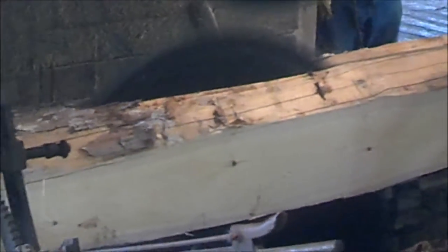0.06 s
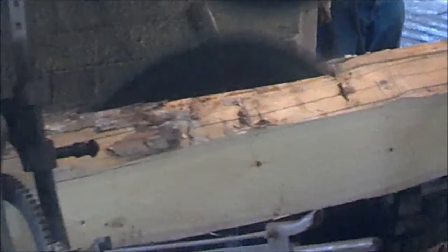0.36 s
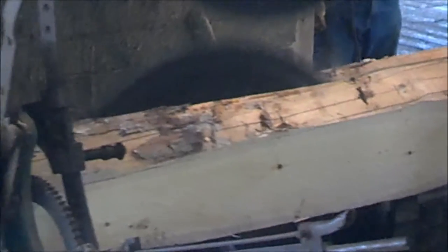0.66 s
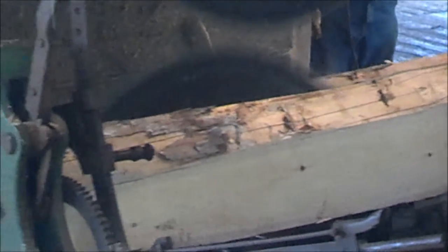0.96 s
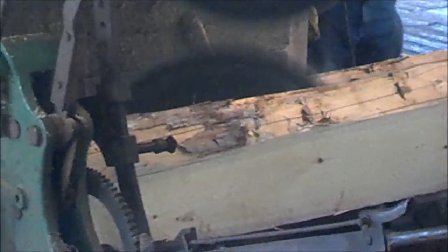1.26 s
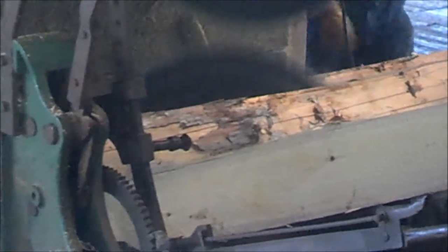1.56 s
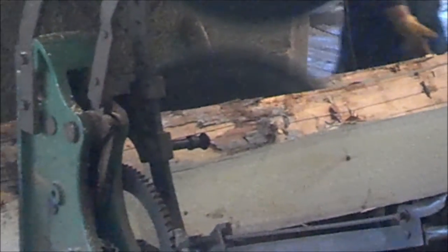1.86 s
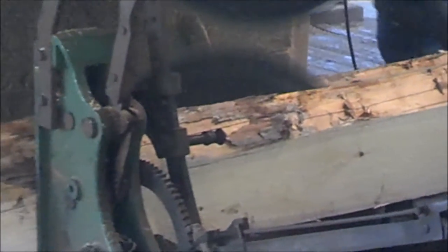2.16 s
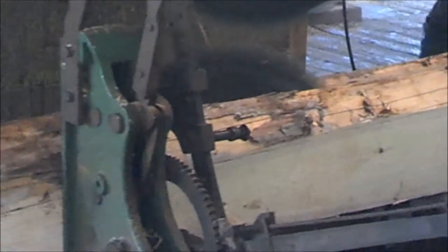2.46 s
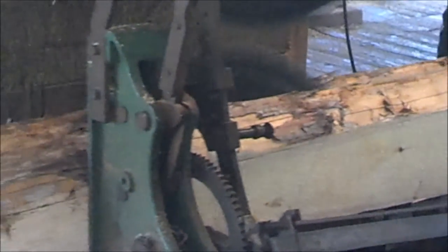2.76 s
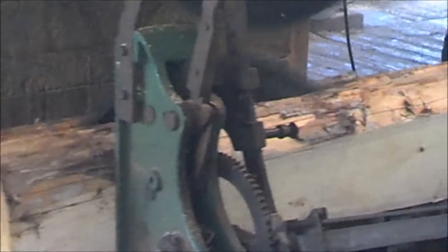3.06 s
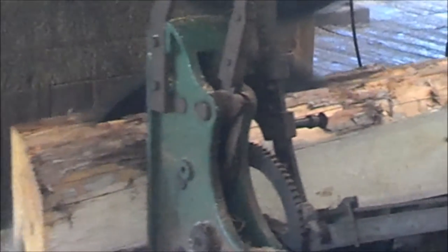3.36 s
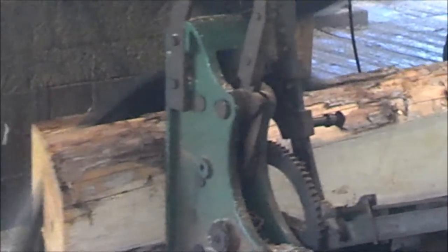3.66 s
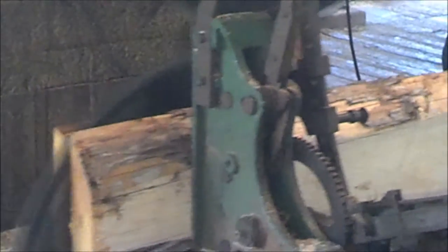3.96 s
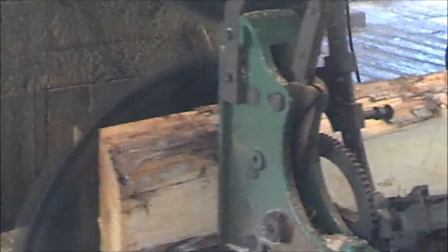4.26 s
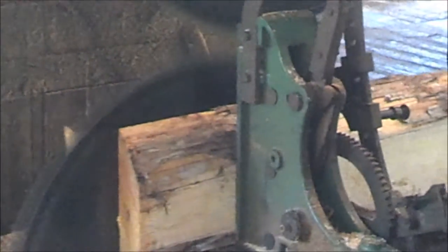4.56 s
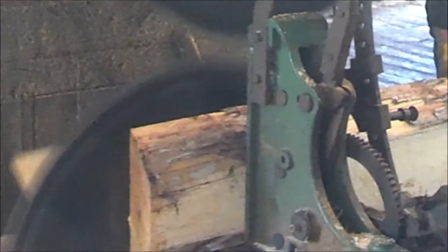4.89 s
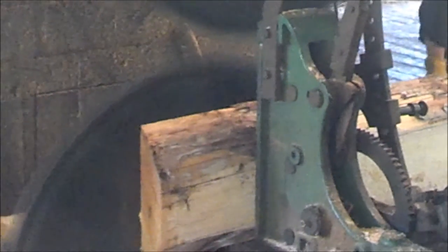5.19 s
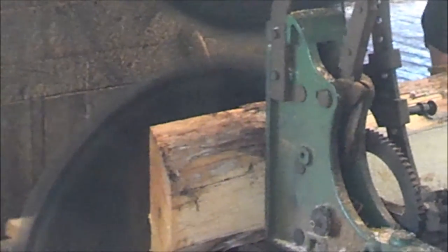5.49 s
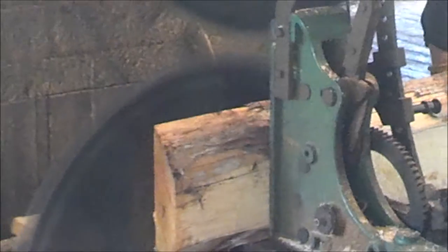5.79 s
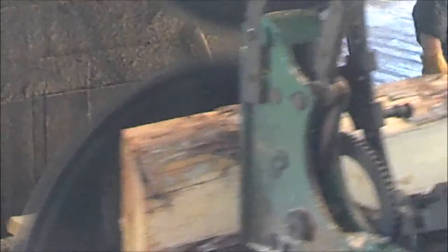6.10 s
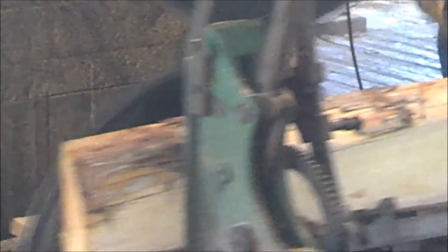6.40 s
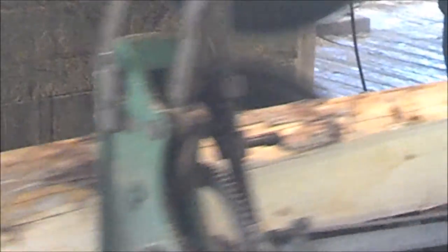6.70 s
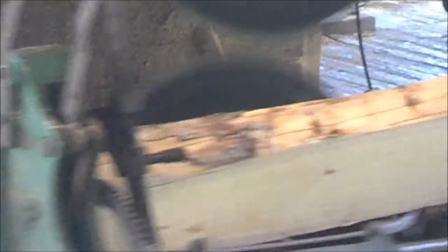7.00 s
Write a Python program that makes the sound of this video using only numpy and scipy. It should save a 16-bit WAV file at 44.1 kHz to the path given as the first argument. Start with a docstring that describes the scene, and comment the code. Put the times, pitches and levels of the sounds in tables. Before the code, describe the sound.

A circular sawmill blade roars and whines through a log, drops to machine rumble, then a slab clunks down and wood scrapes the blade.

```python
"""A sawmill's circular saw rips a log, whining at its tooth rate and labouring through a hard stretch.
The teeth leave the wood; the blade grazes the loose slab and speeds up while its steel plate sings.
The slab drops with a clunk and bounces; an automatic gain control ducks and slowly recovers.
The carriage rumbles back, and the log's sawn face brushes the blade about once a turn."""
import sys
import numpy as np
from scipy import signal
from scipy.fft import rfft, irfft, next_fast_len
from scipy.io import wavfile

SR = 44100
rng = np.random.default_rng(int(sys.argv[2]) if len(sys.argv) > 2 else 0)


def store_wav(level_fs):
    """Save 16-bit WAV to argv[1]."""
    pcm = np.round(np.clip(np.atleast_2d(level_fs), -1, 1) * 32767)
    wavfile.write(sys.argv[1], SR, pcm.T.astype(np.int16))


N = 314874
TIME = np.arange(N) / SR
TEETH, BITE_DB = 30, -33.5  # teeth on the blade; base level of the cut
ACCENT_S = 5.2  # a brief ring and a dip in the roar just after the clunk

# knots in the log: (time [s], half length [s], boost [dB])
KNOT_SURGES = [(0.26, 0.031, 2.5), (0.637, 0.16, 3), (2.02, 0.078, 1.5), (2.394, 0.096, 3),
               (3.133, 0.05, 3)]
# colour of tearing wood: (frequency [Hz], level [dB])
RIP_SPECTRUM = [(100, -20.5), (260, -7.5), (480, -12.5), (580, -6.5), (850, -2), (1250, -6.5), (1500, -6),
                (1750, -5), (2000, -4), (2400, -4), (2900, -3), (3120, -10.5), (3600, -7.5), (4300, -13.5),
                (7000, -24.5), (15000, -59.5)]
# colour of the cut's crackling hiss: (frequency [Hz], level [dB])
CRACKLE_SPECTRUM = [(1200, -35), (3000, -12), (4300, -4), (5700, -8.5), (6700, 2), (7600, -2.5),
                    (9000, 1.5), (10200, -9), (13000, 1), (15500, -5.5)]
def rip(teeth):
    """Teeth tear fibres: the log roars, and a crackling hiss throbs once a turn."""
    bite = amp(BITE_DB) * cutting() + amp(-47.5) * grazing() + 1e-9
    knots_db = sum(db * swell(s, half) for s, half, db in KNOT_SURGES)
    grain_db = 0.51 * wobble(16)  # harder and softer wood
    throb_db = 0.3 * np.cos(2 * np.pi * teeth / TEETH) + 0.85 * wobble(29.55)
    strokes = amp(.5 * np.cos(2 * np.pi * teeth))
    flutter = uneven_teeth(teeth, spread_db=1.4) * unit(amp(.8 * wobble(45)))
    snaps = amp(2.6 * wobble(6000))
    body = amp(10.5 + knots_db + grain_db + 0.8 * wobble(17)) * rush(RIP_SPECTRUM, strokes * flutter)
    depth = np.sqrt(np.minimum(bite / amp(BITE_DB), 1))  # a light touch crackles less
    crackle = amp(5 + grain_db + throb_db) * depth * rush(CRACKLE_SPECTRUM, strokes * snaps)
    return bite * (body + crackle)


# envelopes of tooth harmonics 1, 2 and 3: (time [s], level [dB])
HUM_ENVELOPE = [(0, -36.5), (1.5, -37), (1.75, -54), (2, -38.5), (2.65, -39), (2.82, -29.5), (3.23, -27),
                (3.3, -37), (3.43, -28.5), (3.58, -38), (3.82, -45), (3.92, -31.5), (4.22, -32),
                (4.4, -38.5), (4.75, -30), (5.6, -37.5), (6.2, -35.5), (6.48, -27.5), (6.83, -28.5),
                (7.14, -45)]
HOWL_ENVELOPE = [(0, -23.5), (.26, -21), (.32, -22.5), (.37, -31), (.52, -27.5), (.59, -21), (.9, -25),
                 (.97, -36), (1.3, -32), (2.15, -25.5), (2.28, -32), (2.48, -36), (2.52, -23), (3.46, -23),
                 (3.505, -34), (3.54, -27.5), (3.59, -17), (3.69, -39), (3.74, -22.5), (3.9, -27.5),
                 (3.99, -31.5), (4.1, -29), (4.27, -20.5), (4.33, -27), (4.9, -26), (5.3, -67), (6, -33),
                 (6.55, -26), (7.14, -29)]
THIRD_ENVELOPE = [(0, -32), (.28, -27.5), (.42, -29.5), (.55, -28), (.75, -34.5), (.97, -29), (1.12, -26.5),
                  (1.19, -37), (1.38, -30.5), (1.6, -29.5), (1.75, -41), (1.95, -28), (2.07, -25),
                  (2.16, -33), (2.32, -30.5), (2.42, -39), (3, -35), (3.14, -26), (3.32, -51), (3.43, -30),
                  (3.68, -32), (3.85, -28.5), (3.98, -32), (4.1, -57), (4.28, -26), (4.42, -44), (5.6, -49),
                  (7.14, -36)]
def whine(teeth):
    """Low harmonics of the tooth rate: firm under load, ragged when the blade runs free."""
    wood = cutting()
    firm = tone(2 * teeth, drift=.15, flutter_db=1.3, rate=30)
    ragged = tone(2 * teeth, drift=.5, flutter_db=2, rate=45)
    howl = amp(curve(HOWL_ENVELOPE)) * (wood * firm + (1 - wood) * ragged)
    hum_drift = .2 * wood + .45 * (1 - wood)
    hum = amp(curve(HUM_ENVELOPE)) * tone(teeth, hum_drift, flutter_db=2.2, rate=30)
    third = amp(curve(THIRD_ENVELOPE)) * tone(3 * teeth, drift=.55, flutter_db=2, rate=45)
    return hum + howl + third


# tooth harmonics 4 to 7: (early level [dB], later level [dB])
RASP_LEVELS = [(-38, -38.5), (-33.5, -35), (-34.5, -33.5), (-35.5, -38)]
def rasp(teeth):
    """Wood gives the whine its edge: upper harmonics that each swell and sink on their own."""
    out = 0
    for k, levels_db in enumerate(RASP_LEVELS, 4):
        db = np.interp(TIME, [1.008, 1.3], levels_db)  # the grain changes
        out += amp(db + 1.5 * wobble(4.15)) * tone(k * teeth, drift=.42, flutter_db=2.5, rate=35)
    return cutting() * out


# squeal accents: (time [s], half length [s], level [dB])
PINCHES = [(.72, .1, -34), (.98, 0.16, -33), (2.46, .07, -28.5), (2.77, .092, -31), (3.083, 0.089, -31),
           (3.8, 0.048, -26), (4.222, 0.024, -19)]
def squeal(teeth):
    """The fourth tooth harmonic squeals where the wood pinches the blade."""
    level = sum(amp(db) * swell(s, half) for s, half, db in PINCHES)
    return level * tone(4 * teeth, drift=0.33, flutter_db=3.5, rate=54)


# choked plate modes: (frequency [Hz], width [Hz], level [dB], gain while binding [dB])
DAMPED_MODES = [(917, 23, -41, 3.5), (1372, 52, -38, 4.5), (1627, 26, -44.5, 9.5), (2170, 130, -39.5, 2),
                (2310, 100, -33, 4), (2576, 120, -40, 4), (2914, 74, -33.5, -3)]
def damped_plate():
    """Wood around the blade damps its plate into broad, noisy resonances."""
    binding = swell(1.97, half=0.65)  # the cut closes on the blade
    return cutting() * sum(amp(db + bind_db * binding + 2.2 * wobble(4.98)) * resonance(hz, width)
                           for hz, width, db, bind_db in DAMPED_MODES)


# clear plate modes: (frequency [Hz], level in the cut [dB], when free [dB], as the slab lands [dB])
SINGING_MODES = [(1813, -44, -35, -38), (1907, -37.5, -32.5, -34)]
def singing_plate():
    """Two close modes of the steel plate sing out once it is free and fade after the slab lands."""
    wood, landing = cutting(), SLAB_HITS[0][0]
    fade_db = hold_db(0, landing, release=12)
    out = 0
    for hz, cut_db, free_db, landed_db in SINGING_MODES:
        ring_db = np.interp(TIME, [landing, landing + 0.054], [free_db, landed_db]) + fade_db
        level = wood * amp(cut_db) + (1 - wood) * amp(ring_db)
        out += level * tone(hz * TIME, drift=0.5, flutter_db=1.8, rate=16)
    return out


# rough spots on the sawn face: (time [s], length [s], level [dB])
ROUGH_SPOTS = [(6.475, .008, -29.5), (6.501, .01, -33), (6.55, .006, -31), (6.58, .004, -35),
               (6.628, .004, -38), (6.648, 0.019, -35), (6.722, 0.018, -34), (6.782, 0.031, -29),
               (6.86, .007, -28), (6.881, 0.018, -29.5), (6.958, .008, -35), (7.027, 0.014, -26),
               (7.094, 0.02, -31)]
# colour of the scrape: (frequency [Hz], level [dB])
SCRAPE_SPECTRUM = [(300, -8), (1500, -2.5), (2000, -2), (2500, 2), (3400, -5.5), (5600, -21), (6800, -17),
                   (10000, -22.5), (13000, -18), (15500, -17)]
def scrape(teeth):
    """The returning log brushes the blade; rough spots catch the teeth about once a turn."""
    catches = sum(amp(db + hold_db(s, s + length, attack=2000, release=600))
                  for s, length, db in ROUGH_SPOTS)
    grit = amp(2.4 * wobble(2000)) * uneven_teeth(teeth, spread_db=1.2)
    return (pressing() + catches) * rush(SCRAPE_SPECTRUM, grit)


def graze():
    """The loose slab touches the blade with one short rasp."""
    return amp(-29.5) * grazing() * resonance(hz=2373, width_hz=1000)


# tooth harmonics 5 to 7: (level relative to the steady scrape [dB])
RUB_LEVELS = [-9.5, -9, -9.5]
def rub(teeth):
    """Teeth rubbing the sawn face lay a pitched buzz under the scrape."""
    return pressing() * sum(amp(db) * tone(k * teeth, drift=.6, flutter_db=2.5, rate=30)
                            for k, db in enumerate(RUB_LEVELS, 5))


# landing and bounce: (time [s], ring level [dB], clatter level [dB])
SLAB_HITS = [(5.074, 6.5, -8), (5.0966, -1.5, -17), (5.334, -6.5, -9)]
# the slab's woody ring: (frequency [Hz], level [dB], t60 [s])
SLAB_MODES = [(326, -11.5, .13), (470, -10, .045), (560, -14, .07), (668, -6.5, .07), (735, -12, .09),
              (802, -14, .1), (886, -4.5, .1), (925, -2.5, .035), (1093, -14, .035), (1320, -7, .03)]
# colour of the rollers: (frequency [Hz], level [dB])
CLATTER_SPECTRUM = [(40, -31), (200, -3), (450, 0.5), (700, 3), (1000, -1), (1500, -17), (2500, -25),
                    (5000, -52), (15000, -64)]
def slab():
    """The heavy slab cracks onto the rollers and rings briefly; they clatter, and it bounces."""
    ring, clatter, crack = np.zeros((3, N))
    t = np.arange(SR // 2) / SR
    onset = 1 - np.exp(-t / 0.0016)
    modes = sum(amp(db - 60 * t / t60) * np.sin(2 * np.pi * hz * t) for hz, db, t60 in SLAB_MODES)
    for s, ring_db, clatter_db in SLAB_HITS:
        span = slice(round(s * SR), round(s * SR) + len(t))
        ring[span] += onset * amp(ring_db) * modes
        clatter[span] += (1 - np.exp(-t / 0.003)) * amp(clatter_db - 60 * t / 0.45)
        crack[span] += onset * amp(ring_db - 21 - 60 * t / .012)
    return ring + amp(-8) * shed(ring) + clatter * rush(CLATTER_SPECTRUM) + crack * rush(SCRAPE_SPECTRUM)


# colour of the machine bed: (frequency [Hz], level [dB])
ROAR_SPECTRUM = [(25, -38), (70, -20.5), (130, -9), (320, -6), (420, -6.5), (490, -7.5), (640, -0.5),
                 (850, 1), (1200, -6.5), (1430, -1), (1800, -10.5), (2150, -15), (3400, -27.5), (5600, -40),
                 (6800, -39), (10000, -44.5), (15000, -43.5)]
def roar():
    """Blade and drive roar and rattle, opening up as the cut ends and dipping just after the clunk."""
    open_db = np.interp(TIME, [3.7, 4.62], [-26, -20])
    lowered = np.interp(TIME, [SLAB_HITS[-1][0], 5.3], [0, 1])  # a step down near the slab's bounce
    dips_db = -2.5 * lowered - 2 * accent()
    level = amp(open_db + dips_db + 0.35 * wobble(14))
    rattle = amp(0.6 * wobble(250))
    return level * rush(ROAR_SPECTRUM, rattle)


# envelope of the rumble: (time [s], level [dB])
CARRIAGE_ENVELOPE = [(0, -36), (1, -41), (1.8, -32), (2.4, -39), (4, -33.5), (4.8, -30.5), (6, -34),
                     (6.6, -25.5), (7.14, -23.5)]
# colour of the rumble: (frequency [Hz], level [dB])
RUMBLE_SPECTRUM = [(25, -31), (70, -8), (150, 2.5), (280, 4), (420, -1), (700, -15), (2000, -50)]
# feed drones: (frequency [Hz], level relative to the rumble [dB], gain while labouring [dB])
FEED_DRONES = [(218.3, -11.5, 11), (286.7, -5.5, 0)]
def carriage():
    """The carriage rumbles on its rails and drones while it feeds the log."""
    level_db = curve(CARRIAGE_ENVELOPE)
    rumble = amp(level_db + 0.97 * wobble(10)) * rush(RUMBLE_SPECTRUM)
    labouring = amp(hold_db(2.74, 3.73, attack=53, release=53))  # a hard stretch of the log
    drone = sum(amp(db + labour_db * labouring) * tone(hz * TIME, drift=0.6, flutter_db=2, rate=16)
                for hz, db, labour_db in FEED_DRONES)
    feed_db = hold_db(0, 3.96, release=17)
    return rumble + amp(level_db + feed_db) * drone


# soft wheel thuds: (time [s], half length [s], level [dB])
WHEEL_THUDS = [(2.05, .1, -44), (4.53, .09, -36.5), (4.95, .1, -34)]
# colour of a thud: (frequency [Hz], level [dB])
THUD_SPECTRUM = [(45, -30), (85, -13), (120, 2), (150, -9), (260, -28), (1000, -80)]
def wheels():
    """The laden carriage thuds over its rails and groans for a moment in the cut."""
    thuds = sum(amp(db) * swell(s, half) for s, half, db in WHEEL_THUDS) * rush(THUD_SPECTRUM)
    groan = amp(-33) * swell(1.8, half=.2) * resonance(hz=295, width_hz=40)
    return thuds + groan


def frame():
    """The carriage's iron frame rings briefly just after the clunk, then rattles on."""
    rattling = np.clip((TIME - ACCENT_S) / 0.018, 0, 1)
    level = amp(-28) * accent() + amp(-37 + 4.2 * wobble(45)) * rattling
    return level * resonance(hz=1496, width_hz=140)


# reverb of the shed: (frequency [Hz], t60 [s])
SHED_DECAY = [(150, 0.97), (1000, 0.44), (10000, 0.099)]
def shed(x):
    """The walls answer with a stereo tail whose treble dies first."""
    hz, t, noise = signal.stft(rng.standard_normal((2, SR // 2)), SR, nperseg=256)
    decay = amp(-60 * t / along(SHED_DECAY, hz)[:, None])
    _, tail = signal.istft(noise * decay, SR, nperseg=256)
    return signal.fftconvolve(x[None], tail / np.linalg.norm(tail[0]), axes=1)[:, :N]


def cutting():
    """1 while the teeth are in the log, dying to 0 as they leave it."""
    return amp(hold_db(0, 3.921, release=161))


def grazing():
    """1 while the loose slab touches the blade."""
    return amp(hold_db(4.21, 4.249, attack=265, release=265))


def pressing():
    """Gain of the rubbing as the sawn face leans on the blade and eases off."""
    return amp(-27.5 + hold_db(6.485, 6.485, attack=227, release=9))


def accent():
    """Envelope of the brief ring and the dip in the roar just after the clunk."""
    return swell(ACCENT_S, half=0.018)


def uneven_teeth(teeth, spread_db):
    """No two teeth bite alike, so their pattern flutters past once a turn."""
    sizes = amp(spread_db * unit(rng.standard_normal(TEETH)))
    return unit(np.interp(teeth, np.arange(TEETH), sizes, period=TEETH))


# stereo image of the noise: (frequency [Hz], left-right correlation [0 to 1])
STEREO_LIKENESS = [(100, .98), (1700, .94), (2100, .25), (2800, .93), (4500, .9), (15000, .95)]
def rush(spectrum, strength=1):
    """Stereo noise of rms 1: a random force of varying strength through a spectrum."""
    def mid_side(hz):
        width = np.arccos(np.clip(along(STEREO_LIKENESS, hz), -1, 1)) / 2
        return amp(along(spectrum, hz)) * [np.cos(width), np.sin(width)]
    mid, side = filtered(rng.standard_normal((2, N)) * strength, mid_side)
    return unit(np.array([mid + side, mid - side]))


def tone(cycles, drift, flutter_db, rate):
    """A sine of rms 1 wavering in phase (drift, in radians) and in level."""
    phase = 2 * np.pi * cycles + drift * wobble(rate)
    return unit(np.sin(phase) * amp(flutter_db * wobble(rate)))


def resonance(hz, width_hz):
    """Noise of rms 1 ringing in one damped mode."""
    return unit(filtered(rng.standard_normal(N), lambda f: 1 / (1 + (2 * (f - hz) / width_hz) ** 2)))


def hold_db(start, end, attack=0, release=0):
    """0 dB from start to end, with ramps in dB a second before and after."""
    return -attack * np.maximum(start - TIME, 0) - release * np.maximum(TIME - end, 0)


def swell(s, half):
    """A smooth bump of height 1 around time s."""
    return np.exp(-((TIME - s) / half) ** 2)


def wobble(rate):
    """A smooth random curve, rate points a second."""
    points = rng.standard_normal(int(N * rate / SR) + 2)
    fine = signal.resample(points, next_fast_len(12 * len(points)))
    return np.interp(np.arange(N) * len(fine) / N, np.arange(len(fine)), fine)


def curve(points):
    """(time, value) breakpoints read at every sample."""
    return np.interp(TIME, *np.transpose(points))


def along(points, hz):
    """(frequency, value) breakpoints read on a log axis."""
    f, v = np.transpose(points)
    return np.interp(np.log(hz + 1), np.log(f + 1), v)


def filtered(x, response):
    """x through a complex frequency response."""
    m = next_fast_len(N + SR // 2)
    return irfft(rfft(x, m) * response(np.fft.rfftfreq(m, 1 / SR)), m)[..., :N]


def amp(db):
    """Decibels to gain."""
    return 10 ** (np.asarray(db) / 20)


def unit(x):
    """Scaled to rms 1."""
    return x / np.sqrt(np.mean(x ** 2) + 1e-20)


# the blade sags in the wood and recovers when free: (time [s], tooth rate [Hz])
TOOTH_RATE = [(0, 377.6), (0.5, 372.2), (0.75, 372.9), (1.3, 367.4), (1.6, 367.8), (2, 368), (2.4, 371.2),
              (3, 365.2), (3.6, 367.2), (3.85, 371.4), (4.2, 383), (4.7, 383.6), (5.6, 398.3), (7.1, 398.7)]
def scene():
    """The blade's speed drives the cut, whine and scraping, over a bed of machinery."""
    teeth = np.cumsum(curve(TOOTH_RATE)) / SR  # count of teeth gone by
    saw = rip(teeth) + whine(teeth) + rasp(teeth) + squeal(teeth)
    plate = damped_plate() + singing_plate()
    touches = scrape(teeth) + graze() + rub(teeth)
    bed = roar() + carriage() + wheels() + frame()
    return saw + plate + touches + slab() + bed


# stereo balance: (frequency [Hz], left minus right [dB])
MIC_BALANCE = [(100, 0.5), (450, 5.5), (850, 6), (1600, 0.5), (2700, 2.5), (4200, 1.5), (6500, -1),
               (9000, -1), (12200, -2), (15000, 0.5)]
# stereo phase: (frequency [Hz], left lead [rad])
MIC_PHASE = [(30, -2.8), (170, -1.9), (450, -1), (900, -.3), (1800, 0), (2050, .6), (2250, 2.4),
             (2650, 2.2), (3000, 2.5), (3350, 3.2), (4900, 6), (5600, 6.6), (6600, 9.4), (16000, 29.3)]
def microphones(hz):
    """Response of two capsules that differ in level and in phase."""
    lead = np.interp(hz, *np.transpose(MIC_PHASE))
    left = amp(along(MIC_BALANCE, hz) / 2) * np.exp(.5j * lead)
    return np.array([left, 1 / left]) / np.sqrt((abs(left) ** 2 + abs(left) ** -2) / 2)


def gain_control(x, limit_db, attack_s, recovery_db_per_s):
    """A peak over the limit ducks the gain, which then creeps back."""
    over_db = np.maximum(20 * np.log10(abs(x).max(0) + 1e-9) - limit_db, 0)
    ramp = recovery_db_per_s * TIME
    duck_db = np.maximum.accumulate(over_db + ramp) - ramp
    pole = np.exp(-1 / (attack_s * SR))
    return x * amp(-signal.lfilter([1 - pole], [1, -pole], duck_db))


def record(dry):
    """Microphone pair, gain control, clipping at full scale and a steep high cut."""
    x = gain_control(filtered(dry, microphones), limit_db=-3, attack_s=.002, recovery_db_per_s=11)
    return filtered(np.clip(x, -1, 1), lambda hz: hz < 15720)


dry = scene()
out = record(dry)
store_wav(out)
```